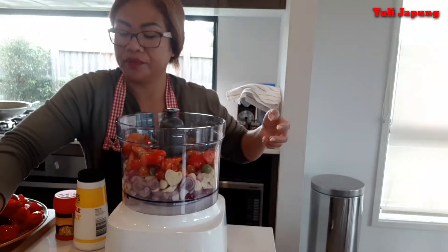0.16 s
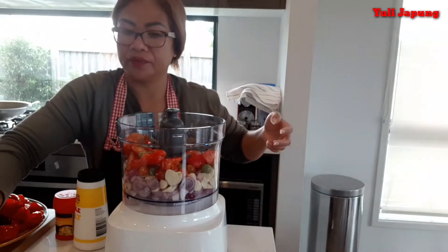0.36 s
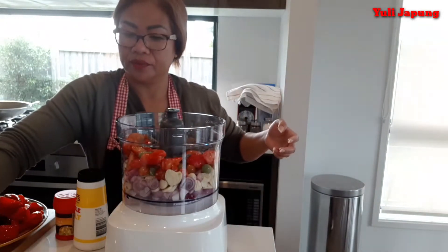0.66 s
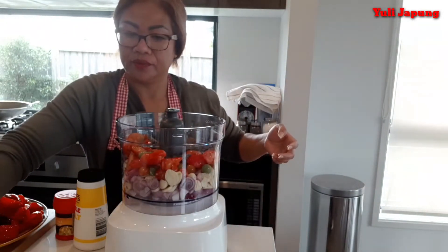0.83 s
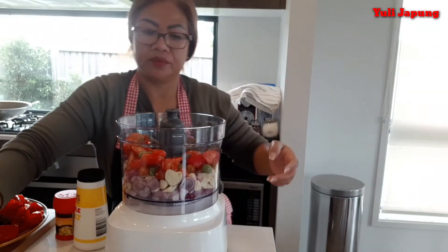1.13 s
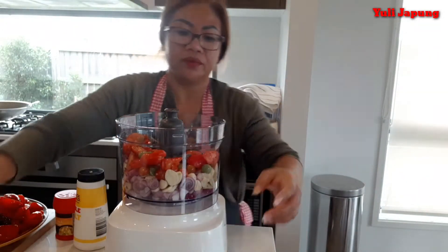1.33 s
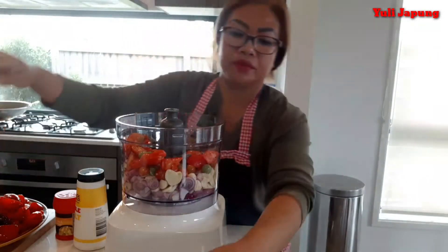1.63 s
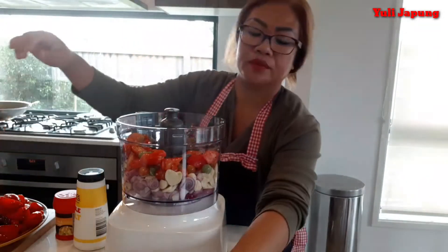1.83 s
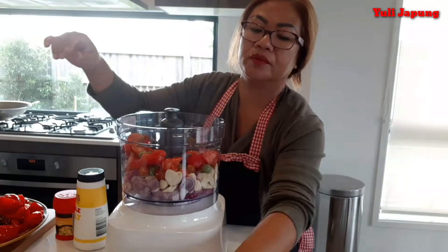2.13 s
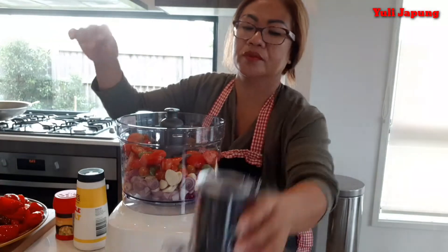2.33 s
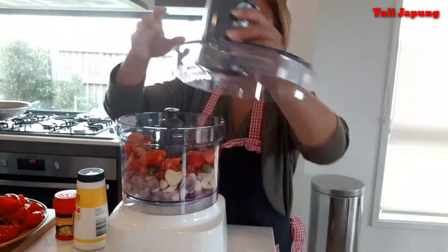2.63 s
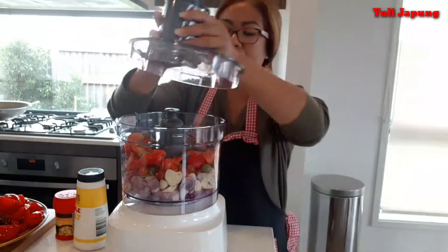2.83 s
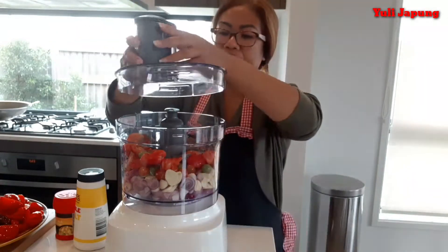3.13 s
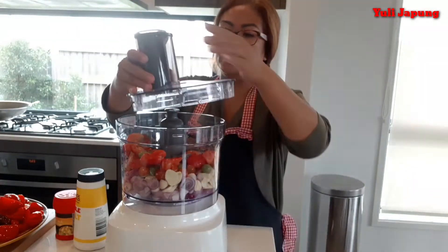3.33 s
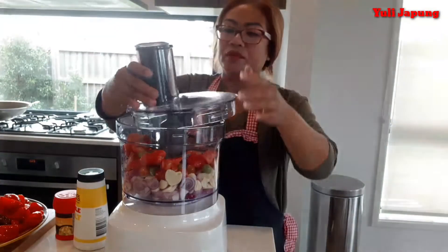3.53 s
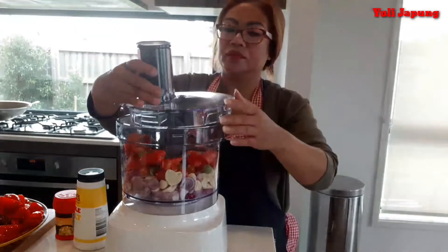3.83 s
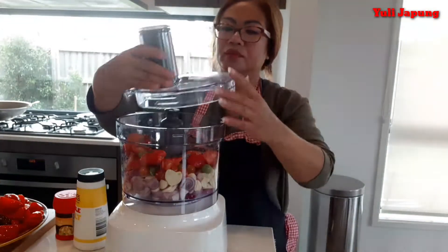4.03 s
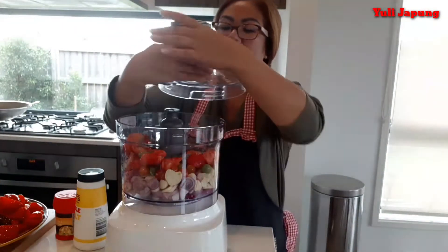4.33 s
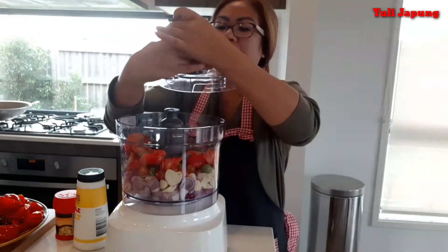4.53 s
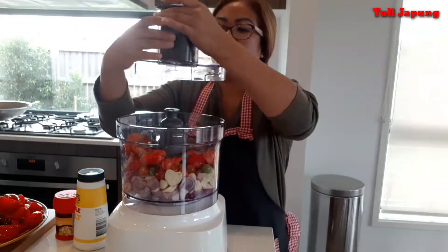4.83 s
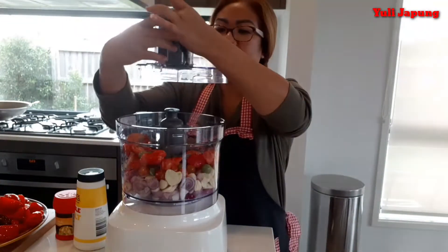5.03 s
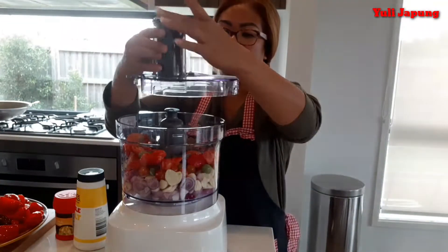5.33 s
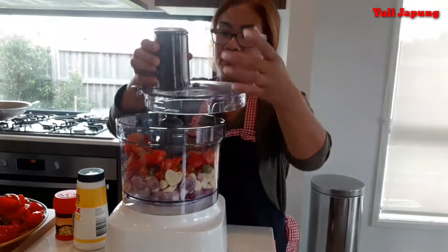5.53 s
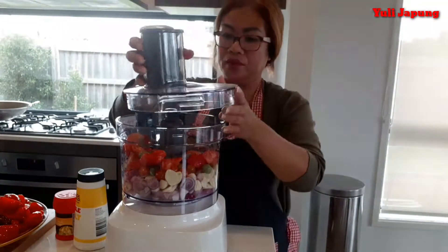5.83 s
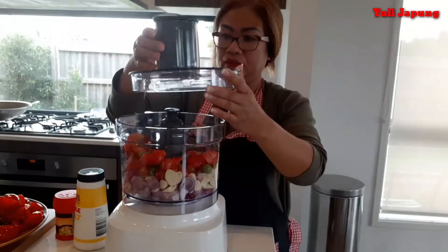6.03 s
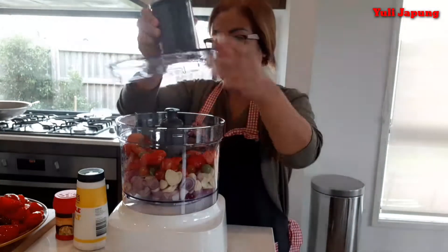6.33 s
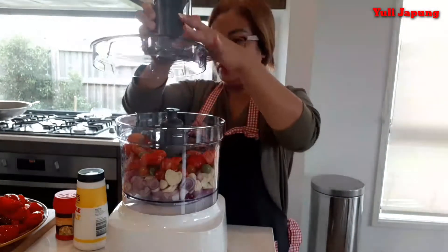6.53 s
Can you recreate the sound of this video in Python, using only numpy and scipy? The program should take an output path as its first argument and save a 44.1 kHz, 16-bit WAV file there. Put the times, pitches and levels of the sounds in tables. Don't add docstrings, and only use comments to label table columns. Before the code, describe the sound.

Ceramic pieces are set down one after another with cracks and high ringing, followed by a small dish chattering to rest. Crockery rubs faintly, a plastic lid is lifted, and after a lull it bangs onto a hollow bowl. Its pusher then slips, slides and knocks in the tube, most busily near the end. The close pickup catches short, dense kitchen reflections over faint air noise.

```python
import sys
import numpy as np
from scipy import signal
from scipy.fft import rfft, irfft, next_fast_len
from scipy.io import wavfile

SR = 44100
rng = np.random.default_rng(int(sys.argv[2]) if len(sys.argv) > 2 else 0)


def int16_out(signal):
    q = np.round(np.clip(np.atleast_2d(signal).T, -1, 1) * 32767)
    wavfile.write(sys.argv[1], SR, q.astype(np.int16))


def ratio_of_db(decibels):
    return 10 ** (np.asarray(decibels, float) / 20)


N = 294588
LEAD = 2205
LONG = next_fast_len(N + LEAD)

# (frequency [Hz], level [dB])
AIR_SPECTRUM = [(13, -40.5), (40, -9), (112, -4), (337, -12.5), (910, -20.5), (1400, -23.5), (3900, -28),
                (16000, -28)]
# (time [s], level [dB])
AIR_LEVEL = [(0, -61), (0.699, -71), (1.5, -62), (3.4, -65), (4.098, -65), (6.7, -62.5)]
# (frequency [Hz], likeness [1])
AIR_LIKENESS = [(30, 0.82), (240, 0.41), (950, 0.56), (3770, -0.37), (15000, -0.02)]
# (frequency [Hz], likeness [1])
ECHO_LIKENESS = [(100, 1), (300, 0.88), (700, 0.4), (1500, 0.059)]
# (frequency [Hz], t60 [s])
KITCHEN_T60 = [(100, 0.35), (400, 0.54), (1500, 0.52), (4000, 0.47), (8000, 0.37), (15000, 0.21)]
# (frequency [Hz], level [dB], t60 [s])
GLASS = (6800, -47, .2)

# (time [s], ring [dB], crack [dB], counter boom [dB])
DISH_HITS = [
    (-.02, -18, -8.5, -36.5),
    (.004, -27, -13, -41),
    (.022, -29.5, -20, -41.5),
    (.05, -35, -26, -47.5),
]
DISH_BOUNCES = [
    (.138, -22.5, -17.5, -35.5),
    (.146, -23, -18, -40),
    (.159, -37, -30.5, -46),
]
PLATE_HITS = [
    (.7793, -19.5, -15.5, -51.5),
    (.7862, -19.5, -25, -44),
    (.8028, -41, -18.5, -60.5),
    (.86, -44, -36.5, -61),
    (.893, -28.5, -37.5, -69.5),
]
STACK_HITS = [
    (1.1197, -20, -16, -41),
    (1.1311, -32, -17, -59),
    (1.2308, -59, -28.5, -70),
    (1.2555, -37, -39, -61),
]
LIFT_HITS = [
    (2.054, -23, -32.5, -43),
    (2.089, -23.5, -40.5, -66),
    (2.098, -20, -39, -46.5),
    (2.109, -55, -51, -56),
]
BOWL_HITS = [
    (3.5712, -13, -13.5, -29.5),
    (3.592, -20.5, -20, -39),
    (3.741, -24, -30.5, -34),
    (3.803, -62, -56, -57),
]
# (time [s], lower tube mode [dB], wall and crack [dB], upper modes over lower [dB])
PUSHER_HITS = [(2.957, -50, -51, -31), (2.989, -41, -49.5, -24), (4.334, -73, -84.5, 1.5),
               (4.418, -47.5, -48, -4), (4.48, -34, -42.5, -24), (4.506, -42.5, -50, 3),
               (5.161, -64.5, -59, 4.5), (5.199, -47, -53.5, 3), (5.234, -36.5, -73, -18.5),
               (5.289, -39.5, -83.5, -15), (5.524, -49, -70, -23), (5.562, -43, -76, -20.5),
               (5.626, -43.5, -82, -14.5), (5.729, -42.5, -66.5, -14.5), (5.783, -45.5, -65.5, -4.5),
               (5.877, -33, -49, -14.5), (5.894, -32, -56.5, -11), (5.923, -41, -62, -12),
               (5.954, -43, -50, -0.5), (6.041, -44.5, -42.5, 2.5), (6.096, -33, -46.5, -11.5),
               (6.136, -25.5, -40.5, -13), (6.15, -54, -68, 5), (6.352, -63, -66, -17.5),
               (6.373, -44.5, -55, -3), (6.506, -54.5, -84, -21), (6.56, -50, -57, -12.5),
               (6.584, -42.5, -58, -5.5), (6.608, -38.5, -40, -2.5), (6.653, -54, -52, 7)]

# (frequency [Hz], level [dB], t60 [s])
DISH_MODES = [(584, -7.5, 0.04), (832, -7, 0.046), (1059, 1.5, 0.02), (1430, -7, 0.033),
              (2105, -1.5, 0.022), (3177, -8.5, 0.1), (4039, -2.5, 0.1), (6240, -10, 0.064),
              (7600, -18.5, 0.23), (9070, -33, 0.16), (10000, -20.5, 0.092), (10880, -17, 0.059),
              (13020, -18, 0.027)]
PLATE_MODES = [(1149, -26, 0.05), (2217, -20, .05), (2518, 3.5, 0.2), (2680, -7.5, 0.15), (4336, -7, 0.07),
               (5790, -18.5, 0.0326), (7080, -28.5, .1), (7710, -10.5, .15), (9100, -19.5, .12),
               (10465, -15.5, 0.22), (11200, -21, 0.09), (11594, -10, 0.26), (13780, -23.5, .06)]
STACK_MODES = [(1270, -20.5, 0.51), (2550, 3, 0.097), (3203, 3, 0.17), (3900, -6, 0.17), (4384, 10, 0.04),
               (5820, -3.5, 0.11), (6380, -10.5, 0.095), (7770, -18, 0.46), (7310, -17.5, .15),
               (9400, -14.5, 0.056), (10520, -4, 0.066), (11070, -13, 0.24), (11630, -5.5, 0.23),
               (13000, -24.5, .06)]
SAUCER_MODES = [(1037, -17.5, .05), (1282, -10.5, 0.04), (2550, -4, .035), (2718, -5, 0.087),
                (3500, 3, 0.024), (4615, 0, 0.016), (5730, -13.5, 0.016), (6400, -6, 0.014)]
LID_MODES = [(455, 1.5, 0.033), (588, -6, 0.042), (644, -6.5, 0.064), (864, -14, 0.064), (940, -3.5, 0.03),
             (1268, -4, 0.054), (1660, -17.5, .05), (2450, -4, 0.057), (2890, -10, .03)]
BOWL_MODES = [(340, -9, 0.047), (454, -0.5, 0.09), (492.4, -1, 0.1), (557, -8, 0.085), (755, -8.5, 0.024),
              (850, -11.5, 0.062), (1000, -9.5, 0.034), (1280, -18.5, 0.029), (1600, -7, 0.0056),
              (1876, -16.5, 0.059), (3320, -6.5, 0.0092), (276, -10, 0.047)]
PUSHER_MODES = [(766.2, -5.5, 0.044), (982, 0, 0.032), (1228, -11, 0.073), (1600, -31, 0.048),
                (1877, -37, 0.013), (2320, -17.5, 0.03), (3017, -22.5, 0.011), (4100, -19, 0.023),
                (5150, -22.5, 0.046), (6420, -16.5, 0.011)]

# (time [s], level [dB])
FIRST_TICK = [
    (1.01, -39),
]
# (time [s], level [dB])
ROCK_ENERGY = [(1.29, -24), (1.7, -32), (2.15, -42), (2.5, -45), (2.85, -53), (3.5, -69.5)]
ROCK_START_S, FIRST_SWING_S, LAST_SWING_S = 1.2972, .04978, .0249
SWINGS, SETTLE_SWINGS = 62, 28
LIMP_S, LIMP_SWINGS = .004, 25
LEAN_DB_PER_S, LEVEL_AT_S = 2, 1.7

# (time [s], level [dB])
RIM_RASP = (3.5712, -40)

# (frequency [Hz], density [dB per Hz])
SLIDE_HISS = [(600, -27), (1500, -17.5), (2500, 0.5), (4000, 5.5), (7000, 3), (11000, -9), (15800, -11)]
# (start [s], swell [s], hold [s], hiss [dB], tube [dB])
STROKES = [
    [(1.4, 0.29, .04, -47, -80), (1.63, 0.034, 0.13, -102, -46.5), (1.8, 0.075, 0.14, -47, -62.5),
     (2.04, 0.013, 0.056, -53, -40)],
    [(2.923, 0.041, 0.022, -55, -49.5)],
    [(4.4, 0.015, 0.014, -42.5, -44), (4.45, 0.035, 0.0076, -60, -37)],
    [(5.13, 0.017, 0.02, -60.5, -60), (5.17, 0.049, .01, -60, -45.5), (5.23, 0.018, 0.026, -87, -46.5)],
    [(5.515, 0.013, 0.084, -86.5, -50.5), (5.72, .012, 0.08, -77, -51), (5.865, 0.017, 0.023, -60, -37.5),
     (6.028, 0.0089, 0.012, -63, -43), (6.122, 0.0089, 0.006, -53.5, -34)],
    [(6.545, 0.01, 0.0083, -51.5, -66), (6.59, .018, 0.079, -78, -61)],
]
# (lower body [Hz], upper body [Hz], squeal [Hz], squeal width [Hz],
# squeal over the hiss [dB])
SURFACES = [
    (898.3, 1033, 1500, 2950, -4),
    (730, 990, 2370, 780, 3.5),
    (740, 996, 12200, 4100, -7),
    (750, 1010, 5420, 1200, -6),
    (763, 1026, 1600, 1570, -15.5),
    (775, 1300, 4500, 5000, -0.5),
]
# (top octave [dB], upper tube mode against lower [dB])
SURFACE_COLOUR = [
    (3.5, -3.5),
    (4, 3),
    (4.5, 12.5),
    (-1, 0),
    (-10.5, -3.5),
    (3.5, 6.5),
]
SWELL_DB, HISS_FALL_DB_PER_S, TUBE_FALL_DB_PER_S = 40, 151.5, 253


def at_hz(points, hz):
    table = np.array(points)
    return np.interp(np.log(hz), np.log(table[:, 0]), table[:, 1])


def rms_one(x):
    return x / np.sqrt(np.mean(x ** 2) + 1e-20)


def band(x, low_hz, high_hz):
    edges = [low_hz, min(high_hz, .45 * SR)]
    return signal.sosfilt(signal.butter(2, edges, "band", fs=SR, output="sos"), x + 1e-18)


def coloured(spectrum, likeness):
    hz = np.maximum(np.fft.rfftfreq(LONG, 1 / SR), 1)
    mid, side = rfft(rng.standard_normal((2, LONG)))
    alike = np.clip(at_hz(likeness, hz), 0, 1)
    both = np.sqrt(1 + alike) * mid + np.sqrt(1 - alike) * side * [[1], [-1]]
    return rms_one(irfft(both * ratio_of_db(at_hz(spectrum, hz)), LONG))


def ring(clicks, hz, t60):
    radius = ratio_of_db(-60 / (t60 * SR))
    w = 2 * np.pi * hz / SR
    return signal.lfilter([0, np.sin(w)], [1, -2 * radius * np.cos(w), radius * radius], clicks + 1e-18)


def train(seconds, db, tail_s):
    at = np.round(np.asarray(seconds) * SR).astype(int) + LEAD
    span = slice(at.min(), min(at.max() + int(tail_s * SR), LONG))
    clicks = np.zeros(span.stop - span.start)
    clicks[at - span.start] = ratio_of_db(db)
    return clicks, span


def struck(seconds, db, modes, spread_db, rise, split_hz=30):
    uneven = rng.normal(0, 1, (len(seconds), len(modes)))
    out = np.zeros(LONG)
    for k, (hz, level_db, t60) in enumerate(modes):
        mode_db = db + level_db + spread_db * uneven[:, k]
        clicks, span = train(seconds, mode_db, 2 * (t60 + rise))
        unit_drive = 2 * np.log(1000) / (rise * SR)
        push = (-1) ** k * ring(clicks, hz, rise) * unit_drive
        out[span] += ring(push, hz, t60) + .5 * ring(push, hz + split_hz, t60)
    return out


def crack(seconds, db, low_hz, high_hz, t60):
    clicks, span = train(seconds, db, .4)
    fade = signal.lfilter([1], [1, -ratio_of_db(-60 / (t60 * SR))], clicks + 1e-18)
    out = np.zeros(LONG)
    out[span] = band(fade * rng.standard_normal(LONG)[span], low_hz, high_hz)
    return out


def room_tone():
    level = ratio_of_db(np.interp(np.arange(N) / SR, *np.transpose(AIR_LEVEL)))
    return level * coloured(AIR_SPECTRUM, AIR_LIKENESS)[:, :N]


def kitchen(x):
    size = 3 * SR // 4
    edges = 80 * 2 ** np.arange(0, 8.1, .5)
    t = np.arange(size) / SR
    white = coloured([(20, 0), (20000, 0)], ECHO_LIKENESS)[:, :size]
    tail = np.zeros((2, size))
    for low, high in zip(edges, edges[1:]):
        t60 = at_hz(KITCHEN_T60, np.sqrt(low * high))
        tail += band(white, low, high) * ratio_of_db(-60 * t / t60)
    tail = tail * np.clip((t - .003) / 0.0027, 0, 1)
    tail = tail / np.sqrt(np.sum(tail ** 2) / 2)
    wet = signal.fftconvolve(np.atleast_2d(x), tail, axes=1)[:, :LONG]
    hz, level_db, t60 = GLASS
    return wet + ratio_of_db(level_db) * np.array([ring(side, hz, t60) for side in wet])


def placed(x, lag, pan_db):
    late = np.pad(x, (round(lag), 0))[:LONG]
    return np.array([late, x]) * ratio_of_db([[pan_db / 2], [-pan_db / 2]])


def blow(hits, modes, ring_db, crack_db, low_hz, high_hz, t60, boom_hz):
    s, body_db, top_db, low_db = np.transpose(hits)
    body = struck(s, body_db + ring_db, modes, spread_db=3.5, rise=0.0016)
    boom = struck(s, low_db + 2.5, [(boom_hz, 0, .07)], spread_db=0.3, rise=0.045, split_hz=3.7)
    return body + crack(s, top_db + crack_db, low_hz, high_hz, t60) + boom


def dish():
    landing = blow(DISH_HITS, DISH_MODES, -0.5, 0.1, 300, 4400, 0.063, 150)
    return landing + blow(DISH_BOUNCES, DISH_MODES, -7.0, 0.088, 238, 12000, 0.014, 178)


def plate():
    return blow(PLATE_HITS, PLATE_MODES, -4.5, -2.5, 1800, 14000, 0.027, 170)


def stack():
    return blow(STACK_HITS, STACK_MODES, -4.0, 0.1232, 1000, 11000, 0.029, 175)


def rocking():
    k = np.arange(SWINGS)
    slow_part = (FIRST_SWING_S - LAST_SWING_S) * SETTLE_SWINGS * (1 - np.exp(-k / SETTLE_SWINGS))
    limp = LIMP_S * np.exp(-k / LIMP_SWINGS) * (k % 2)
    s = ROCK_START_S + LAST_SWING_S * k + slow_part - limp
    lean_db = (-1) ** k * LEAN_DB_PER_S * (s - LEVEL_AT_S)
    db = np.interp(s, *np.transpose(ROCK_ENERGY)) - lean_db
    s, db = np.r_[FIRST_TICK[0][0], s], np.r_[FIRST_TICK[0][1], db]
    belly = struck(s + .006, db - 7.5, SAUCER_MODES[:4], spread_db=1.6, rise=.02, split_hz=53)
    rim = struck(s, db - 8.5, SAUCER_MODES[4:], spread_db=1.4, rise=0.0041)
    return belly + rim + crack(s, db - 2.5, 2700, 6900, 0.017)


def lid_lift():
    return blow(LIFT_HITS, LID_MODES, -14.5, 7.5, 180, 2800, .04, 190)


def bowl_knock():
    return blow(BOWL_HITS, BOWL_MODES, -5, 0.1, 230, 4500, 0.036, 146.3)


def rim_rasp():
    return crack([RIM_RASP[0]], RIM_RASP[1], 9700, 15260, 0.32)


def stroke(t, start, swell, hold, level_db, fall_db):
    rising = np.clip((t - start) / max(swell, .004), 0, 1)
    falling_s = np.maximum(t - start - swell - hold, 0)
    return (t > start) * ratio_of_db(level_db - SWELL_DB * (1 - rising) - fall_db * falling_s)


def sliding():
    t = (np.arange(LONG) - LEAD) / SR
    tube, hiss = np.zeros(LONG), np.zeros((2, LONG))
    size = ratio_of_db(2.5 * np.minimum(rng.exponential(1, LONG), 4))
    grit = size * rng.choice([-1, 1], LONG) * (rng.random(LONG) < 500 / SR)
    noise = coloured(SLIDE_HISS, ECHO_LIKENESS)
    for rows, surface, (top_db, upper_db) in zip(STROKES, SURFACES, SURFACE_COLOUR):
        lower_hz, upper_hz, squeal_hz, width_hz, squeal_db = surface
        inside = (t > rows[0][0]) & (t < sum(rows[-1][:3]) + .3)
        now = t[inside]
        lower = rms_one(ring(grit[inside], lower_hz, 0.07))
        upper = rms_one(ring(grit[inside], upper_hz, 0.025))
        modes = ratio_of_db(-upper_db / 2) * lower + ratio_of_db(upper_db / 2) * upper
        press = sum(stroke(now, *row[:3], row[4], TUBE_FALL_DB_PER_S) for row in rows)
        tube[inside] += ratio_of_db(-10.0) * press * modes
        plain = noise[:, inside]
        squeal = rms_one(band(plain, squeal_hz - width_hz / 2, squeal_hz + width_hz / 2))
        brighter = (ratio_of_db(top_db) - 1) * band(plain, 7100, 15000)
        speed = sum(stroke(now, *row[:4], HISS_FALL_DB_PER_S) for row in rows)
        hiss[:, inside] += ratio_of_db(1.5) * speed * (plain + ratio_of_db(squeal_db) * squeal + brighter)
    return tube, hiss


def pusher():
    s, lower_db, top_db, upper_db = np.transpose(PUSHER_HITS)
    s = s - .003
    lower = struck(s, lower_db + 7.0, PUSHER_MODES[:1], spread_db=2.5, rise=0.044, split_hz=4.9)
    upper = struck(s, lower_db + upper_db + 8, PUSHER_MODES[1:3], spread_db=5.0, rise=0.0307)
    wall = struck(s, top_db + 14, PUSHER_MODES[3:], spread_db=-1.5, rise=0.015)
    return lower + upper + wall + crack(s, top_db + 0.5, 600, 3800, 0.17)


def scene():
    tube, hiss = sliding()
    # (sound, lag [samples], pan [dB], share of room [dB])
    sources = [(dish(), 8.5, .3, 3),
               (plate(), 7.0, .1, -1.5),
               (stack(), 6.0, .2, -1.5),
               (rocking(), 2.6, .1, -4),
               (lid_lift(), 3.0, .1, -1.5),
               (bowl_knock(), 1.1, -.6, -1.5),
               (pusher() + tube, .1, 2.1, -5)]
    direct = sum(placed(x, lag, pan_db) for x, lag, pan_db, wet_db in sources)
    to_room = sum(ratio_of_db(wet_db) * x for x, lag, pan_db, wet_db in sources) + ratio_of_db(-8.5) * hiss[0]
    near = direct + kitchen(to_room) + hiss + rim_rasp()
    near = band(near, 115, 19000)
    return near[:, LEAD:LEAD + N] + room_tone()


def band_limit(x):
    return signal.sosfilt(signal.butter(12, 16540, fs=SR, output="sos"), x)


def record(dry):
    cut = signal.sosfilt(signal.ellip(8, .5, 45, 15600, fs=SR, output="sos"), dry)
    return band_limit(cut)


dry = scene()
out = record(dry)
int16_out(out)
```